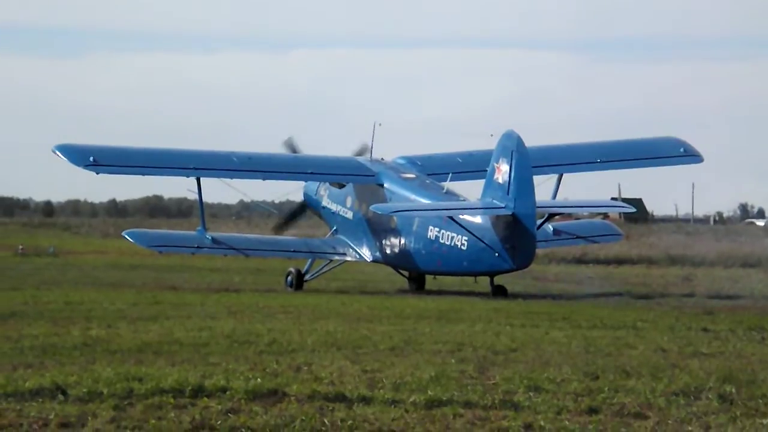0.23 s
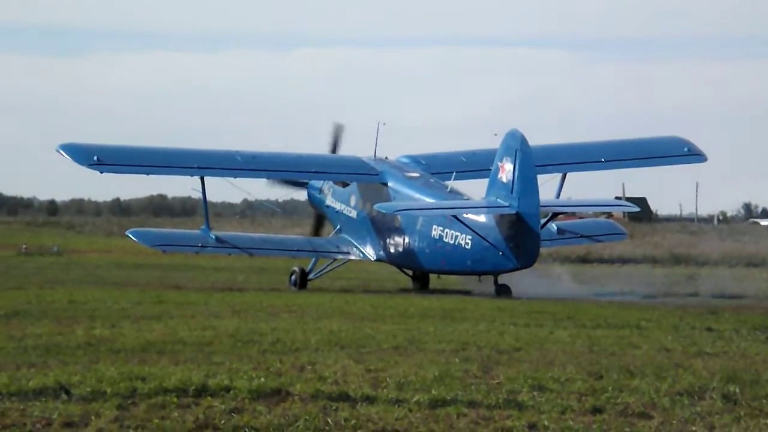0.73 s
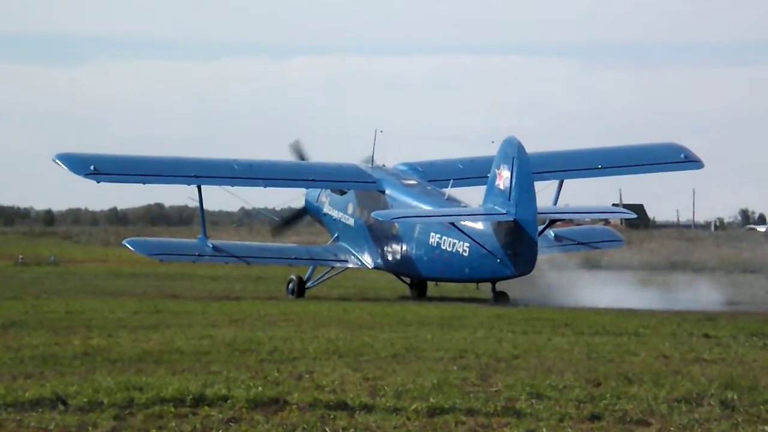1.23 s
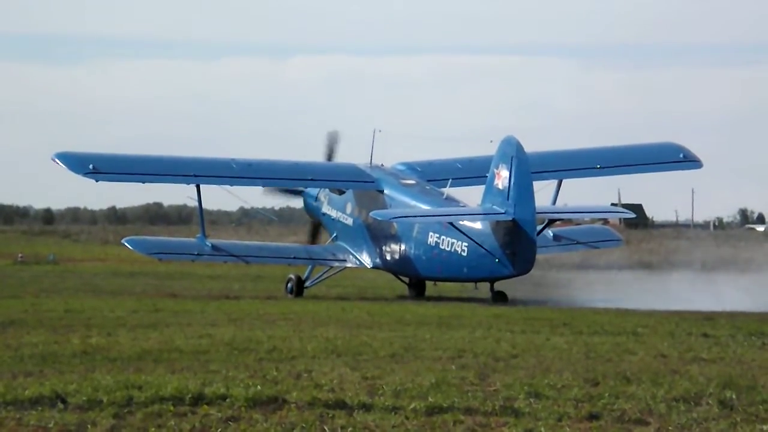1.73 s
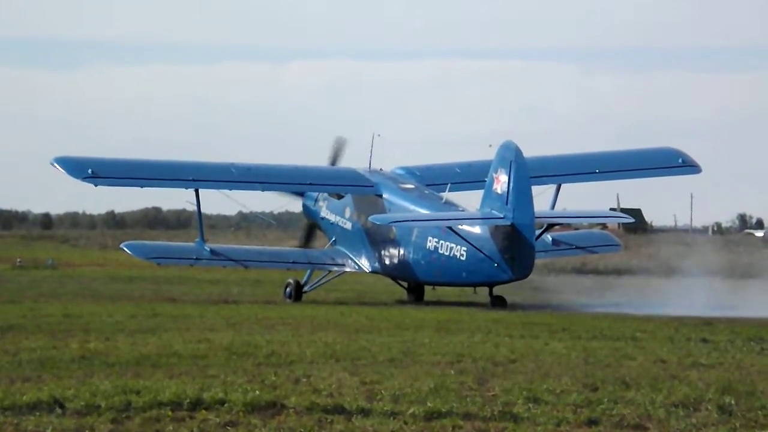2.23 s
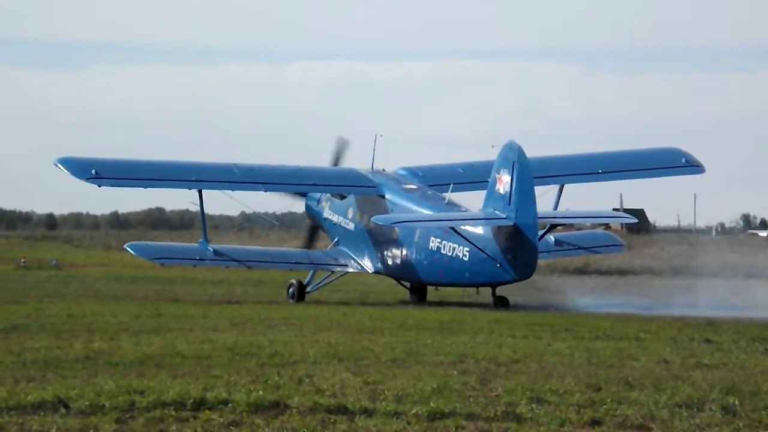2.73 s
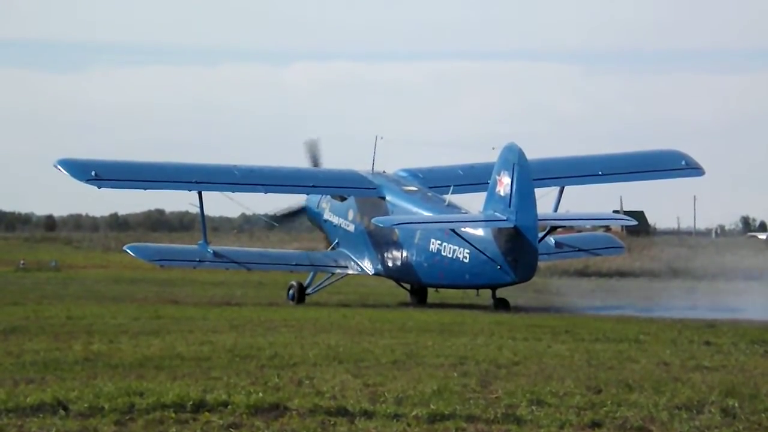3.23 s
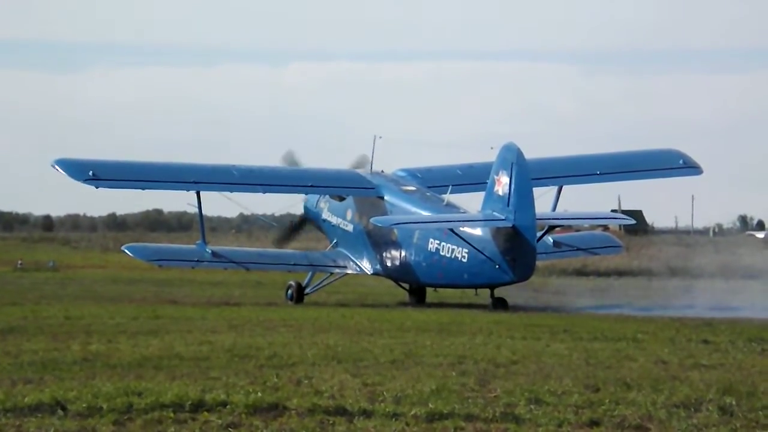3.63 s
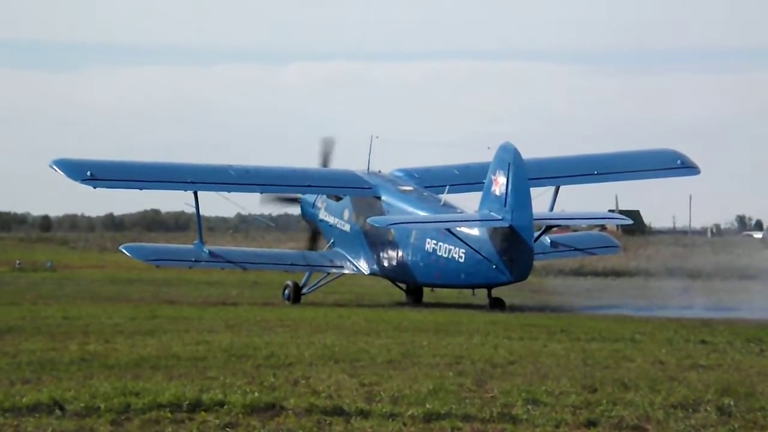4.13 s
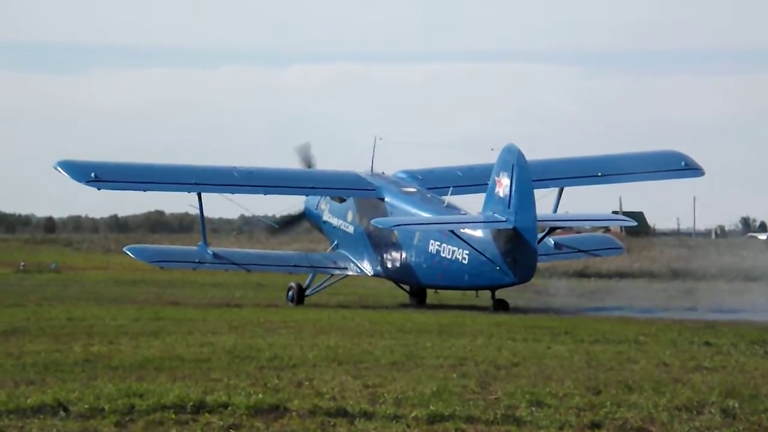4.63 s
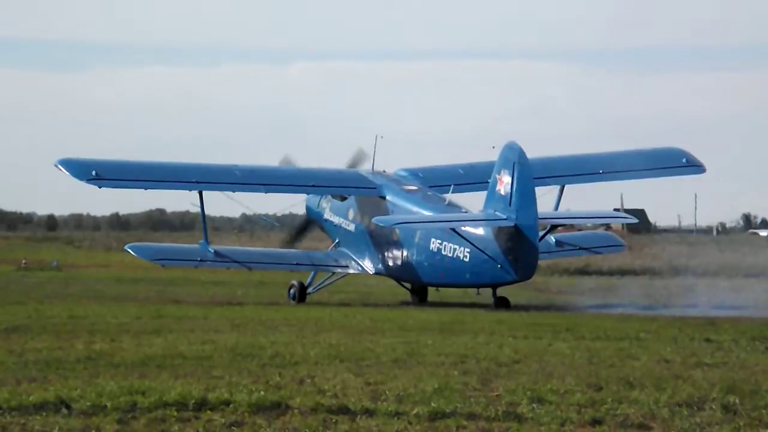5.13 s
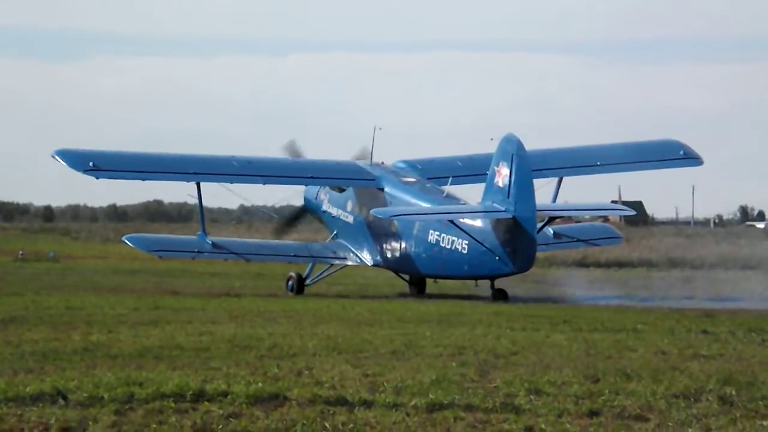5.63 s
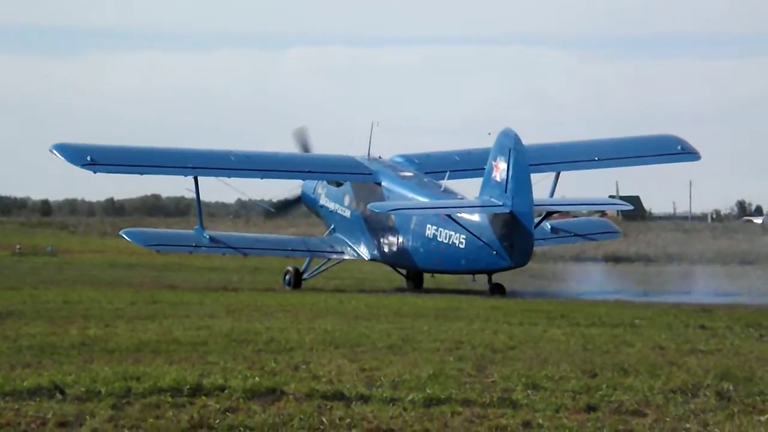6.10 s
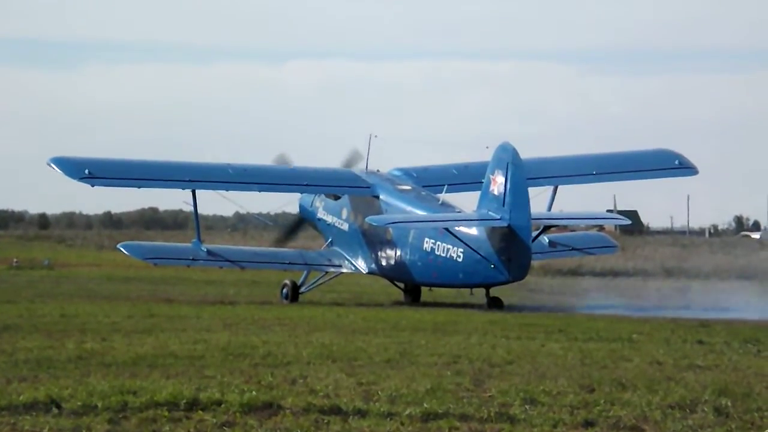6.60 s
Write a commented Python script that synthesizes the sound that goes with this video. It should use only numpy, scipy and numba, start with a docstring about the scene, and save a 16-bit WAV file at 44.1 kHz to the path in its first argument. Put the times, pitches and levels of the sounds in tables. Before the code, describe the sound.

A big radial aircraft engine chugs roughly, backfires with a bang, stumbles, then speeds up into steady, thudding running with rasping propeller chop.

```python
"""A nine-cylinder radial engine catches on a grass airfield: shaped puffs and steady orders make the exhaust chug.
A decaying low-frequency swing backfires, the exhaust drops out for a few cycles, then the engine gathers speed.
Repeating noise eddies make the four-blade propeller chop the air; cracks and faint gliding tones stand out.
Filtered noise makes a deep, uneven engine rumble, a burble of gas and the hiss of the open field.
The heaviest thuds trip a stepping gain control."""
import sys
import numpy as np
from scipy import signal
from scipy.fft import rfft, irfft, next_fast_len
from scipy.io import wavfile
from scipy.ndimage import uniform_filter1d, map_coordinates
from numba import njit

SR = 44100
rng = np.random.default_rng(int(sys.argv[2]) if len(sys.argv) > 2 else 0)


def to_wav(s):
    """Save 16-bit WAV."""
    ch = np.atleast_2d(s).T  # columns
    pcm = np.round(np.clip(ch, -1, 1) * 32767)  # PCM
    wavfile.write(sys.argv[1], SR, pcm.astype(np.int16))


N = 302526
T = np.arange(N) / SR
CYLINDERS, BLADES_PER_CYCLE = 9, 11 / 2  # firings and blade passes per four-stroke cycle
REFERENCE_RPM = 1060  # crankshaft speed at which the speed-dependent levels are stated

# spectrum of turbulent air at the blades, shared by spits of gas and cracks: f/Hz, level/dB
SWISH_SPECTRUM = [(350, -49), (750, -20.5), (1050, -7), (1250, -12.5), (1550, -3.5), (2120, -8),
                  (2350, -15.5), (2650, -4.5), (3250, 0.5), (3800, -10.5), (4300, -22), (6000, -33),
                  (8000, -45.5), (15800, -77)]


def exhaust(uneven_db=1.0, jitter=0.033, waver_db=1.8):
    """Periodic excitation of a resonant pipe: irregular puffs, with harmonics of the cycle rate beneath."""
    # cylinders in firing order: lag in the collector ring/firing intervals, strength/1
    firing_order = [(-0.31, 0.89), (0.038, 0.91), (0.031, 0.7), (0.19, 1), (-0.23, 0.75), (-0.25, 1),
                    (0.064, 0.67), (0.086, 0.96), (-0.35, 0.57)]
    # spectrum of a puff leaving the pipe: f/Hz, level/dB
    pipe_spectrum = [(10, -37), (20, -4), (42, 3), (61, 2), (79, 3.5), (105, -8), (140, -13), (200, -28.5),
                     (300, -61), (500, -80)]
    # speed law: level/dB at the reference speed, gain/dB per doubling
    exhaust_level = (-16, 0)
    turns = cycles(delay_s=.015)
    firing = np.arange(1, int(turns[-1] * CYLINDERS))
    lag, strength = np.array(firing_order)[firing % CYLINDERS].T
    timing, burn = rng.standard_normal((len(firing), 2)).T
    at = np.searchsorted(turns * CYLINDERS, firing + lag + jitter * timing)
    clicks = np.bincount(at, strength * amp(uneven_db * burn), N + 1)[:N]
    puffs = unit(colour(clicks, pipe_spectrum, 1j))
    exhaust_db = by_speed(*exhaust_level) + misfires()[0]
    return amp(exhaust_db) * (puffs + np.sqrt(2) * drone(turns, waver_db))


def drone(turns, waver_db, hum_db=-12):
    """Harmonic synthesis with resonance: each order is lifted as it passes through the pipe's own tone."""
    # steady tones of pipe and propeller: multiple of the cycle rate/1
    orders = [5.5, 11, 14, 16, 16.5, 19, 22, 27.5, 33]
    # one for each order, ahead of the resonance and waver: level/dB against the exhaust
    order_levels = [-12.5, -11.5, -15.5, -20.5, -22, -17.5, -24, -29, -37]
    # pipe resonance: f/Hz, half-width/Hz, lift/dB
    pipe_ring = (124, 6, 5)
    tones = -amp(hum_db) * np.sin(2 * np.pi * CYLINDERS * turns)  # hum in step with the puffs
    cycle_hz = crank_rpm() / 120
    ring_hz, width_hz, ring_db = pipe_ring
    for order, db in zip(orders, order_levels):
        lift_db = ring_db / (1 + ((order * cycle_hz - ring_hz) / width_hz) ** 2)
        level = amp(db + lift_db + waver_db * drift(6.3))
        tones += level * np.cos(2 * np.pi * (order * turns + rng.random()))
    return tones


def misfires(edge_s=0.057):
    """Loss of excitation: the dB that exhaust and rumble change by while the cylinders miss."""
    # missing cycles: start t/s, length/s, exhaust level/dB, rumble level/dB
    gaps = [(.24, 0.277, -10.5, -19), (0.558, 0.084, -16, -23), (0.844, 0.09, -16, -0.5),
            (1.466, 0.094, -3.5, -2.5), (5.775, 0.1, -4, -6)]
    start, length, exhaust_db, rumble_db = np.transpose(gaps)
    inside = np.minimum(T[:, None] - start, start + length - T[:, None])
    missing = np.clip(.5 + inside / edge_s, 0, 1)
    return missing @ exhaust_db, missing @ rumble_db


def thuds(bass, width_s=.0036, ceiling=.62):
    """Saturation: ordinary firings stay below a ceiling; heavy ones swell past it."""
    # extra heavy firings: t/s, peak pressure/full scale (negative = suction)
    heavy_firings = [(0.9356, 0.82), (1.202, .86), (1.2836, 0.87), (2.506, -0.66), (3.043, 0.76),
                     (3.399, 0.74), (3.6484, 0.68), (3.7207, 0.75), (3.838, 0.78), (4.1666, -0.66),
                     (5.0561, 0.73), (5.119, 0.71), (5.2444, 0.78), (5.6328, 0.68), (5.7571, -0.69),
                     (5.7669, 0.97)]
    bass = bass / (1 + (bass / ceiling) ** 4) ** (1 / 4)
    for s, pressure in heavy_firings:
        swell = np.exp(-((T - s) / width_s) ** 2)
        bass = bass + swell * (pressure - bass)
    return bass


def backfire(s=.207, strength=2.84, decay_s=0.02, extra_hz=90, end_hz=25, sag_s=0.00875,
             hiss_db=-21, hiss_rise_s=0.012):
    """Damped oscillation: an overloading pressure swing slows as it dies, with a spit of hot gas."""
    t = np.maximum(T - s, 0)
    # the frequency falls from end_hz + extra_hz to end_hz
    turns = end_hz * t + extra_hz * sag_s * (1 - np.exp(-t / sag_s))
    boom = -strength * np.exp(-t / decay_s) * np.sin(2 * np.pi * turns)
    hiss = unit(colour(rng.standard_normal(N), SWISH_SPECTRUM))
    spit = hiss * t / hiss_rise_s * np.exp(1 - t / hiss_rise_s)
    return boom + amp(hiss_db) * spit


def propeller(buzz_memory=0.78, swish_memory=0.16, buzz_swing_db=3.5, buzz_lead=0.097,
              slap_lag=0.17, sharpness=0.46, blade_db=0.94, flutter_db=0.5):
    """Amplitude modulation at the blade-passing rate: geared-down blades make a pitched rasp and a swish."""
    # rasp spectrum: f/Hz, level/dB
    buzz_spectrum = [(200, -43), (400, -11.5), (480, -4), (560, 1), (680, -0.5), (800, -4), (930, 1.5),
                     (1120, -1.5), (1400, 0), (2000, -35), (2400, -27), (4000, -43.5)]
    # speed laws of rasp, swish and blade-pass swing: level/dB at the reference speed, gain/dB per doubling
    buzz_level = (-32.5, 17.8)
    swish_level = (-27, 7.4)
    slap_swing = (3.18, 2.7)
    # further opening of the swish once the engine has settled: start t/s, rise/s, level/dB
    settled = (3.48, 1.0, 2.26)
    blade = BLADES_PER_CYCLE * cycles()
    passing = 2 * np.pi * (blade - slap_lag)  # lag and lead are shares of a blade interval
    slap = np.cos(passing) + sharpness * (np.cos(2 * passing) + np.cos(3 * passing)) / 2
    uneven_db = blade_db * drift(70) + flutter_db * drift(16)

    # the rasp takes on its full pitch only as the blades come up to speed
    pitched = np.interp(crank_rpm(), [820, 930], [.3, 1])
    repeating = np.sqrt(pitched) * unit(eddies(blade, buzz_memory))
    rasp = repeating + np.sqrt(1 - pitched) * unit(eddies(blade, 0))
    buzz_swing = buzz_swing_db * np.cos(passing + 2 * np.pi * buzz_lead)
    buzz = rasp * amp(buzz_swing + uneven_db / 2)

    swish = eddies(blade, swish_memory) * amp(by_speed(*slap_swing) * slap + uneven_db)
    settle_s, rise_s, settled_db = settled
    swish_db = by_speed(*swish_level) + settled_db * np.clip((T - settle_s) / rise_s, 0, 1)
    buzz = unit(colour(buzz, buzz_spectrum)) * amp(by_speed(*buzz_level))
    return buzz + unit(colour(swish, SWISH_SPECTRUM)) * amp(swish_db)


def eddies(blade, memory):
    """Correlated turbulence: successive blades cut slowly changing eddies, so noise partly repeats."""
    fresh = rng.standard_normal((400, 1024))  # one row for each blade pass
    cuts = signal.lfilter([1], [1, -np.clip(memory, 0, .95)], fresh, axis=0)
    return map_coordinates(cuts.ravel(), [(blade + 10) * 1024], order=3, mode="wrap")


def cracks(trim_db=-2.0, decay_s=0.0033):
    """Exponential decay of noise bursts: brief spits stand out of the chatter in the swish's colour."""
    # sharp cracks: t/s, level/dB at onset ahead of the common trim
    spits = [(0.429, -16), (3.4278, -19.5), (3.976, -17), (4.003, -12), (4.039, -18), (4.061, -14),
             (4.084, -14.5), (5.0983, -11.5), (5.2808, -19), (5.322, -10.5), (5.4446, -10.5), (5.5258, -14),
             (5.6268, -15), (6.036, -21), (6.715, -18)]
    envelope = np.zeros(N)
    for s, db in spits:
        u = np.maximum(T - s, 0) / decay_s
        envelope += amp(db + trim_db) * (u > 0) * np.exp(-u)
    noise = rng.standard_normal(N)
    return colour(envelope * noise, SWISH_SPECTRUM) / colour(noise, SWISH_SPECTRUM).std()


def burble(throb_db=0.5):
    """Modulated flow noise: gas burbles out of the pipe, throbbing with every firing."""
    # burble spectrum: f/Hz, level/dB
    burble_spectrum = [(40, -13.5), (90, -11.5), (150, 10), (190, 0), (240, -8.5), (290, -23), (380, -25.5),
                       (600, -23.5), (1200, -60.5), (6000, -79)]
    # speed law: level/dB at the reference speed, gain/dB per doubling
    burble_level = (-27.5, -2)
    throb = amp(throb_db * np.cos(2 * np.pi * CYLINDERS * cycles()))
    gas = unit(colour(rng.standard_normal(N) * throb, burble_spectrum))
    return gas * amp(by_speed(*burble_level))


def rumble(surge_s=0.044):
    """Low-frequency filtered noise: a deep, uneven engine rumble swells as the engine lurches."""
    # rumble spectrum: f/Hz, level/dB
    rumble_spectrum = [(6, -36.5), (18, -16), (30, -3), (42, 3.5), (55, -7.5), (80, -14.5), (130, -29),
                       (300, -89.5)]
    # speed law: level/dB at the reference speed, gain/dB per doubling
    rumble_level = (-18.5, -6)
    # swells: middle t/s, level/dB
    surges = [(.69, 4.5), (.88, 10.5), (1.53, 9), (2.7, 5), (3.07, 3.5), (3.36, 8), (3.92, 11.5), (4.47, 7),
              (5.73, 0)]
    rumble_db = by_speed(*rumble_level) + swells(surges, surge_s) + misfires()[1]
    return unit(colour(rng.standard_normal(N), rumble_spectrum)) * amp(rumble_db)


def glides():
    """Frequency modulation: soft, short, far-off tones slide in pitch under half-sine envelopes."""
    # faint tones: t/s, length/s, starting f/Hz, ending f/Hz, level/dB
    tones = [(3.676, 0.075, 350, 400, -42.5), (3.724, 0.091, 583, 636, -35.5),
             (4.226, 0.12, 480, 390, -39.5), (4.972, 0.097, 410, 388, -43), (5.008, .14, 483, 543, -36),
             (5.845, .1, 405, 346, -44)]
    out = np.zeros(N)
    for s, length, start_hz, end_hz, db in tones:
        u = np.clip((T - s) / length, 0, 1)
        hz = start_hz + (end_hz - start_hz) * u
        tone = np.sin(2 * np.pi * np.cumsum(hz) / SR)
        out += amp(db) * np.sqrt(2) * np.sin(np.pi * u) * tone
    return out


def field_air(level_db=-59.5):
    """Diffuse noise field: the open field hisses faintly, independently in each channel."""
    # hiss spectrum: f/Hz, level/dB
    air_spectrum = [(50, -38), (500, -26), (3000, 0), (6000, 0), (15000, -16)]
    hiss = [unit(colour(rng.standard_normal(N), air_spectrum)) for _ in range(2)]
    return amp(level_db) * np.array(hiss)


def crank_rpm():
    """Rotational kinematics: crankshaft speed at every sample."""
    # engine run-up: t/s, crankshaft speed/rpm
    run_up = [(0, 765), (.3, 858.9), (.6, 775.5), (1.2, 823.2), (2.3, 948.5), (2.7, 968.4), (3, 1006.3),
              (3.4, 1016.3), (4.1, 1052.1), (5.7, 1066.3), (6.86, 1062.1)]
    return np.interp(T, *np.transpose(run_up))


def cycles(delay_s=0):
    """Phase as integrated speed: four-stroke cycles completed, one for every two crank turns."""
    return np.interp(T - delay_s, T, np.cumsum(crank_rpm()) / SR / 120)


def by_speed(reference_db, db_per_doubling):
    """Power-law scaling: a dB value that follows the crankshaft speed."""
    return reference_db + db_per_doubling * np.log2(crank_rpm() / REFERENCE_RPM)


def swells(rows, width_s):
    """Gaussian envelopes: a smooth rise or dip in dB around each moment."""
    return sum(db * np.exp(-((T - s) / width_s) ** 2) for s, db in rows)


def drift(rate_hz):
    """Band-limited randomness: smooth fluctuation of rms 1."""
    knots = rng.standard_normal(1024)
    coarse = map_coordinates(knots, [T[::64] * rate_hz], order=3, mode="wrap")
    return unit(np.interp(T, T[::64], coarse))


def colour(x, points, turn=1):
    """Spectral filtering; the phase turn 1j makes each click a push followed by suction."""
    size = next_fast_len(N + SR // 4)
    hz, db = np.transpose(points)
    log_hz = np.log(np.fft.rfftfreq(size, 1 / SR) + 1)
    gain = amp(np.interp(log_hz, np.log(hz), db))
    return irfft(rfft(x, size) * gain * turn, size)[:N]


def amp(db):
    """Logarithmic level: decibels to amplitude gain."""
    return 10 ** (np.asarray(db) / 20)


def unit(x):
    """Power normalization: scales to rms 1."""
    return x / np.sqrt(np.mean(x ** 2) + 1e-20)


def scene():
    """Interaural delay: the aircraft's chatter reaches the left one sample later; the bass is mono."""
    # brief dips of the chatter after the two heaviest blows: middle t/s, level/dB
    dips = [(.3, -6), (5.81, -3.5)]
    bass = thuds(exhaust() + rumble() + burble()) + backfire()
    chatter = propeller() * amp(swells(dips, width_s=0.046)) + cracks()
    stereo_chatter = np.array([np.r_[0, chatter[:-1]], chatter])
    return stereo_chatter + bass + glides() + field_air()


@njit
def step_gain(peak, threshold, step, hold, recovery):
    """Feedback gain control: a peak drops the gain a step; it creeps back at once,
    and cannot step again until the hold has passed."""
    gains, gain, wait = np.ones(len(peak)), 1., 0.
    for i in range(len(peak)):
        wait -= 1
        if wait <= 0 and peak[i] * gain > threshold:
            gain, wait = gain * step, hold
        gain += (1 - gain) * recovery
        gains[i] = gain
    return gains


def record(dry, step_db=-3.5, recovery_s=0.054, softness=0.41, edge_hz=15800):
    """Nonlinear transduction: stepping gain that heeds the bass peaks, hard clipping and a band limit."""
    threshold, hold = .68, .007 * SR  # full scale, samples
    peak = abs(uniform_filter1d(dry.mean(0), size=28))
    gain = step_gain(peak, threshold, float(amp(step_db)), hold, 1 / (recovery_s * SR))
    pole = np.clip(softness, 0, .95)
    gain = 1 + signal.lfilter([1 - pole], [1, -pole], gain - 1)  # each step takes a few samples: a tick
    clipped = np.clip(dry * gain, -.96, .96)
    lowpass = signal.firwin(511, edge_hz, window=("kaiser", 9), fs=SR)
    return signal.oaconvolve(clipped, lowpass[None], "same")


dry = scene()
out = record(dry)
to_wav(out)
```